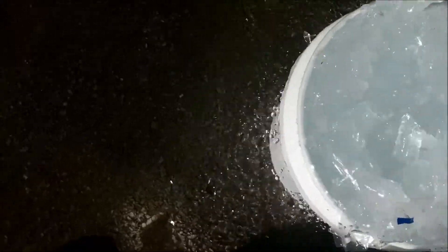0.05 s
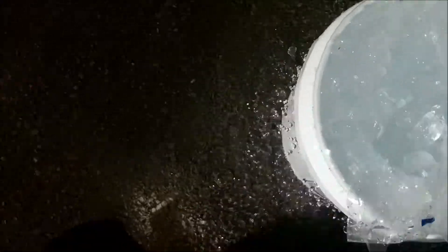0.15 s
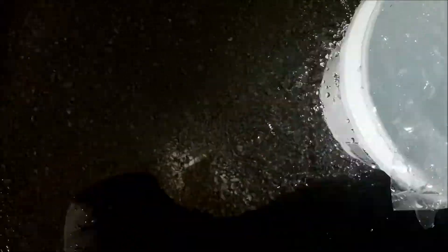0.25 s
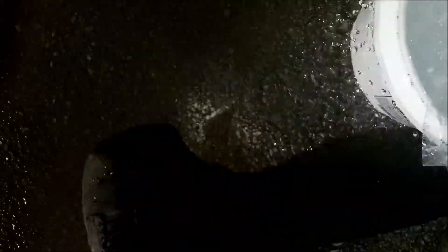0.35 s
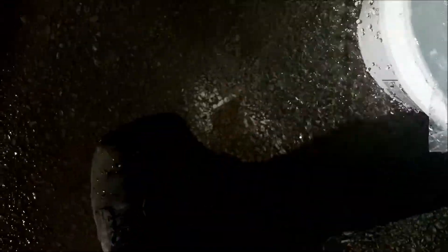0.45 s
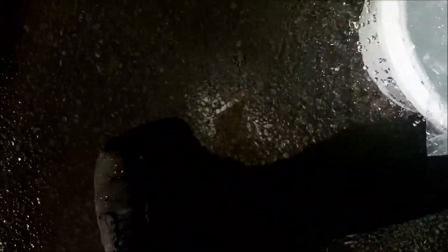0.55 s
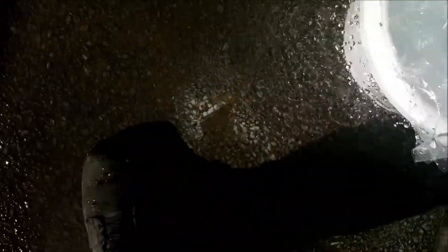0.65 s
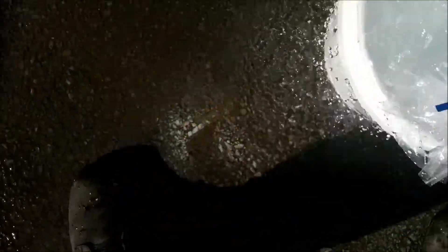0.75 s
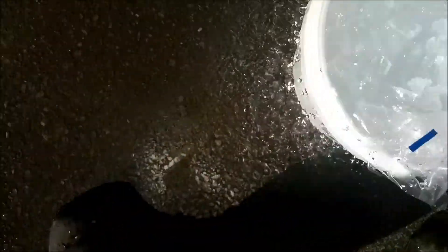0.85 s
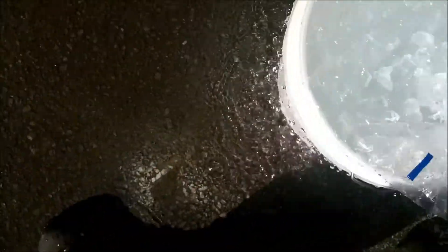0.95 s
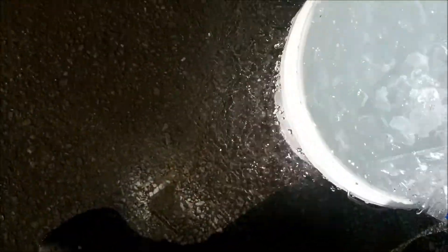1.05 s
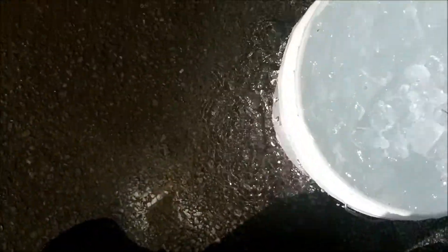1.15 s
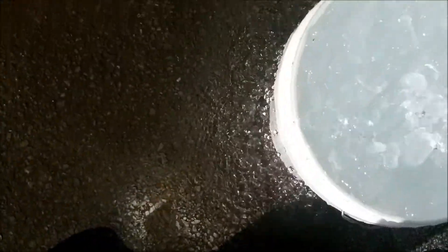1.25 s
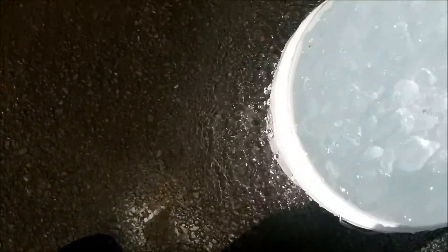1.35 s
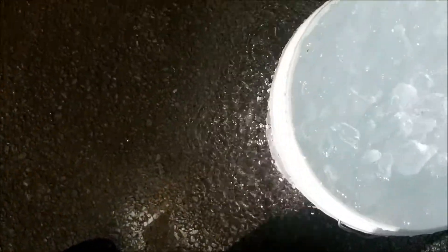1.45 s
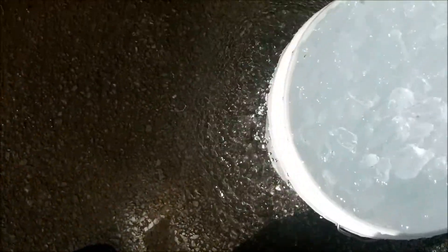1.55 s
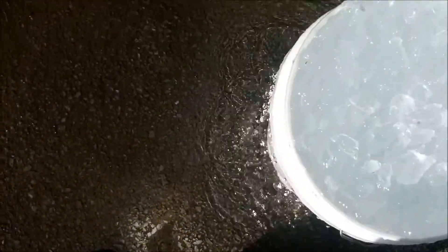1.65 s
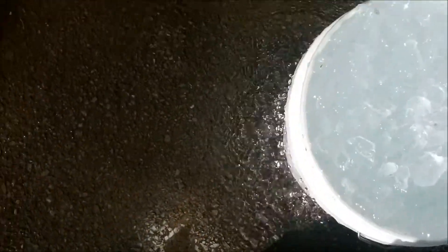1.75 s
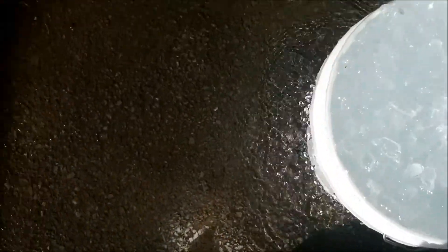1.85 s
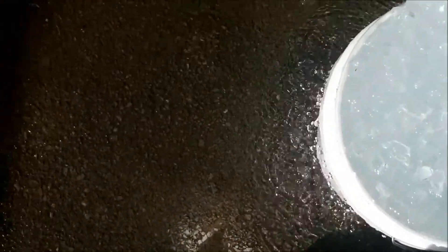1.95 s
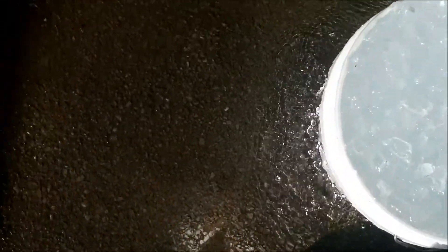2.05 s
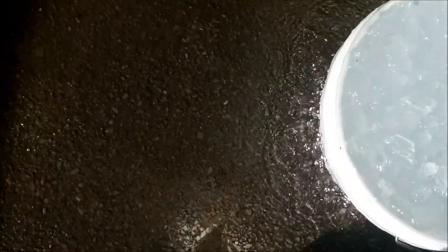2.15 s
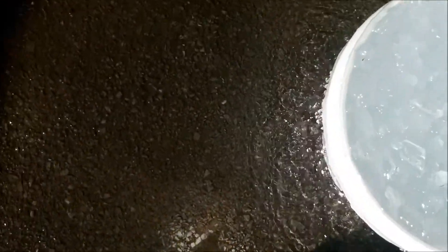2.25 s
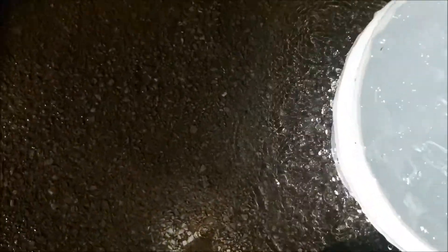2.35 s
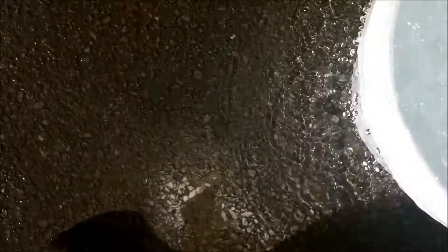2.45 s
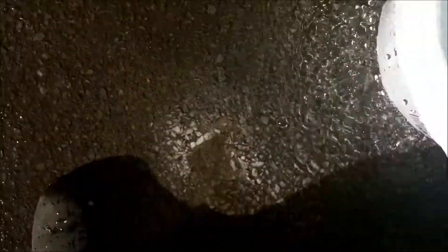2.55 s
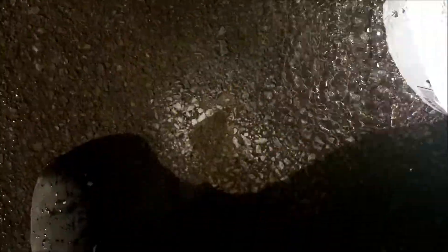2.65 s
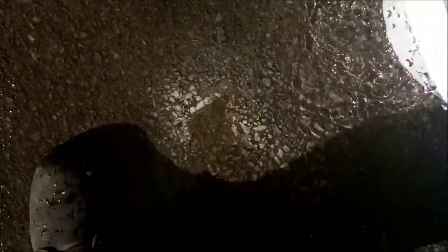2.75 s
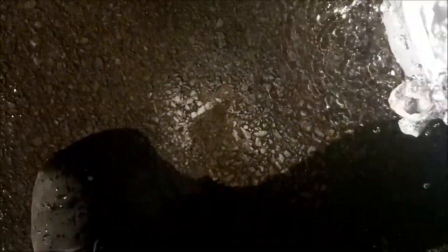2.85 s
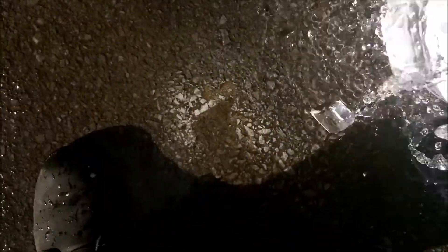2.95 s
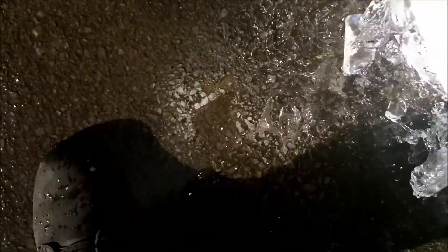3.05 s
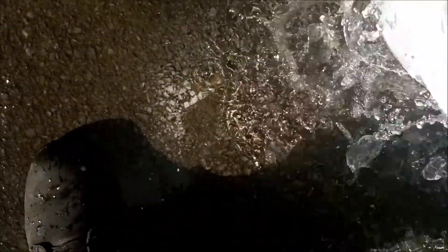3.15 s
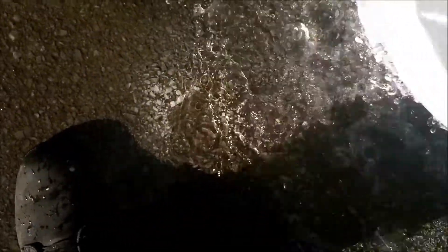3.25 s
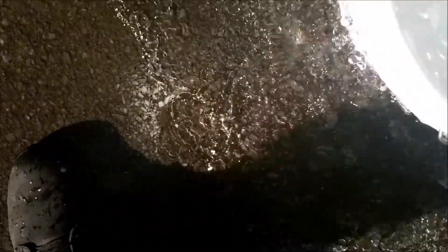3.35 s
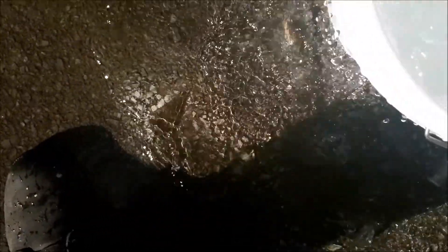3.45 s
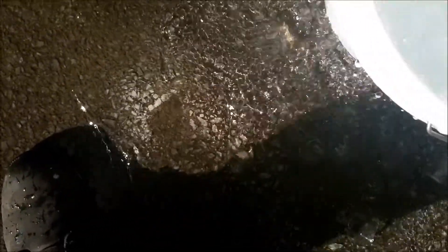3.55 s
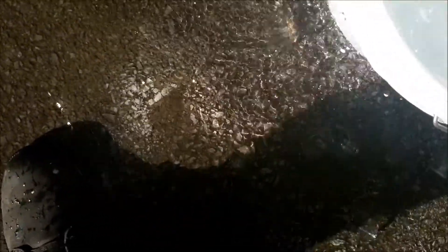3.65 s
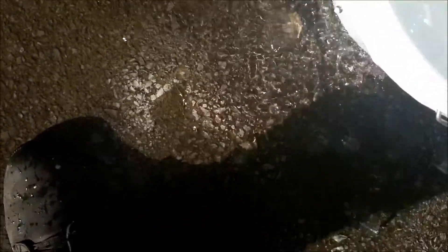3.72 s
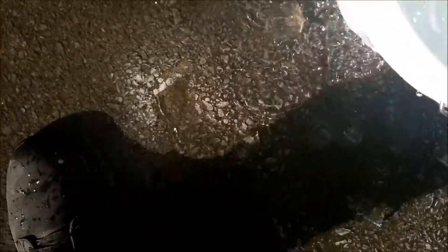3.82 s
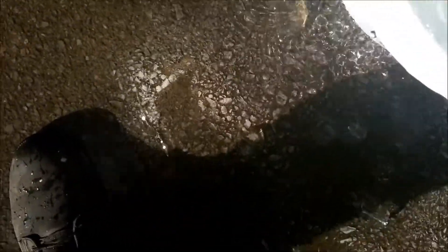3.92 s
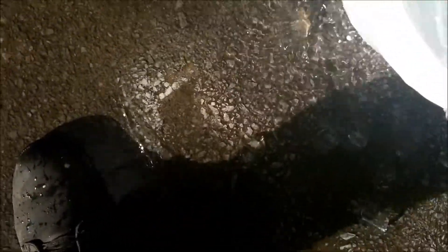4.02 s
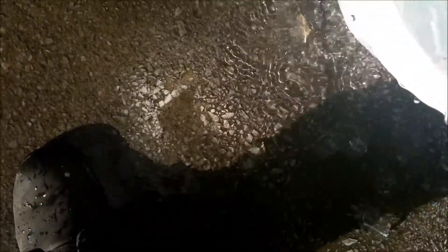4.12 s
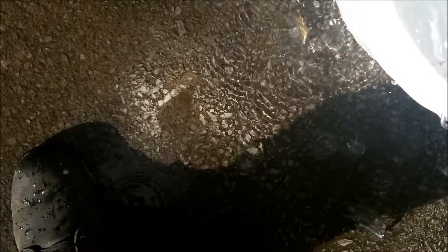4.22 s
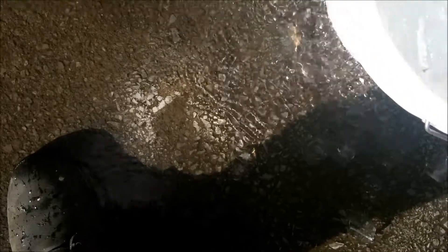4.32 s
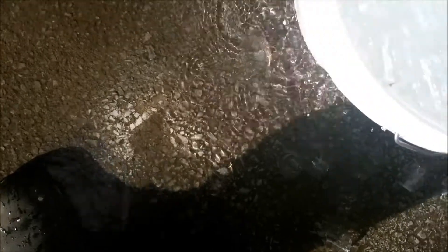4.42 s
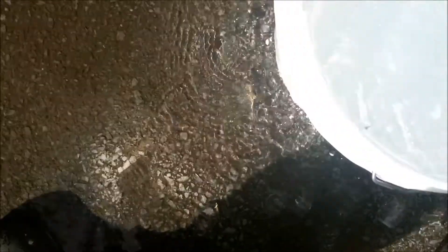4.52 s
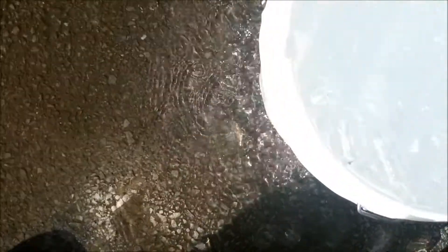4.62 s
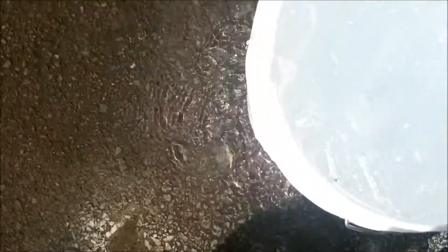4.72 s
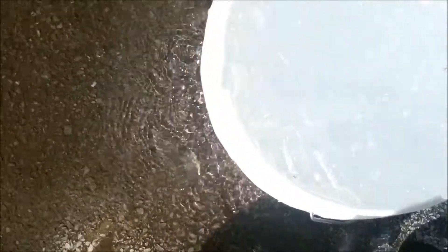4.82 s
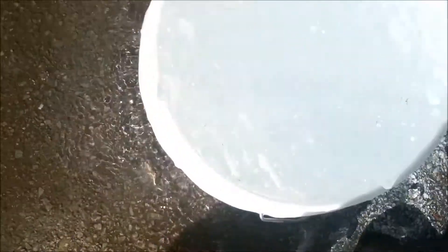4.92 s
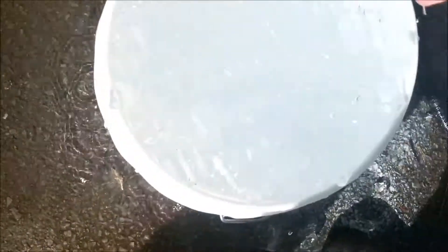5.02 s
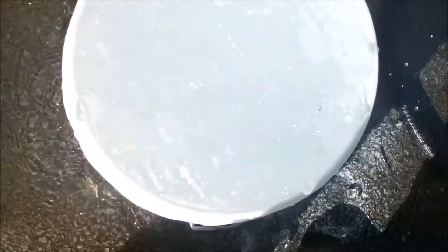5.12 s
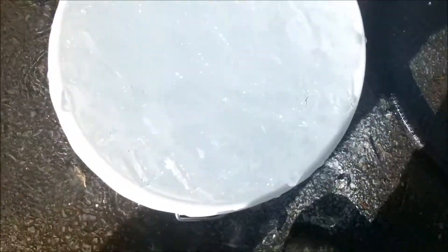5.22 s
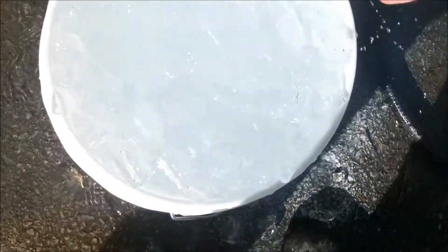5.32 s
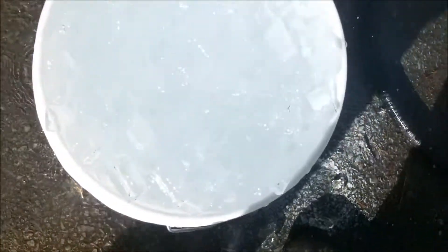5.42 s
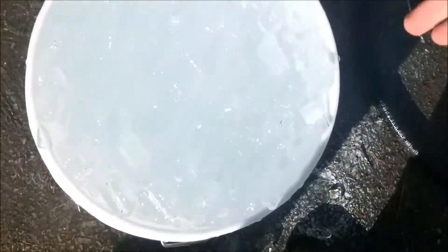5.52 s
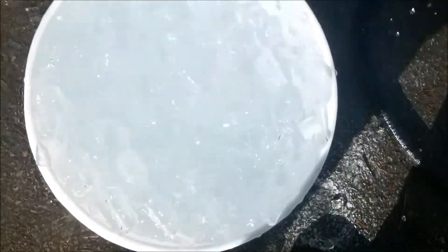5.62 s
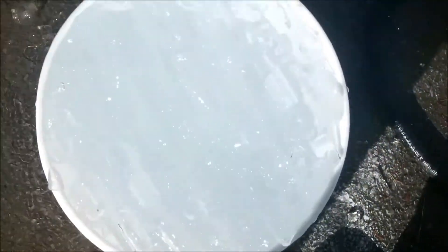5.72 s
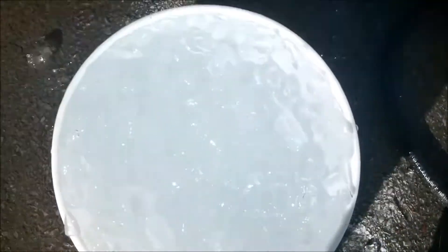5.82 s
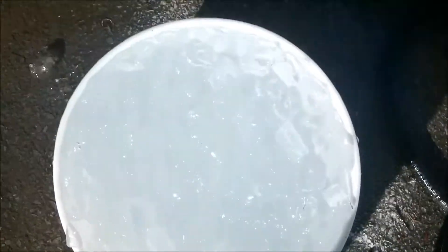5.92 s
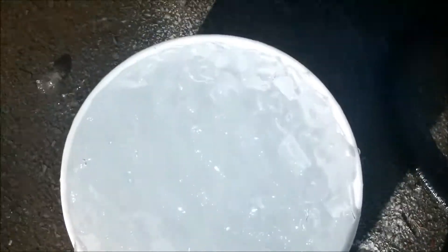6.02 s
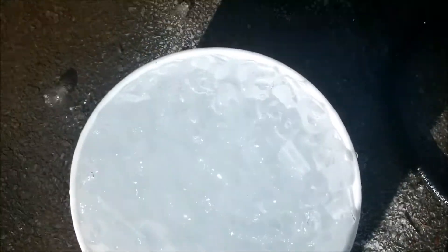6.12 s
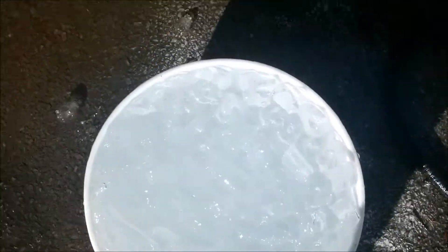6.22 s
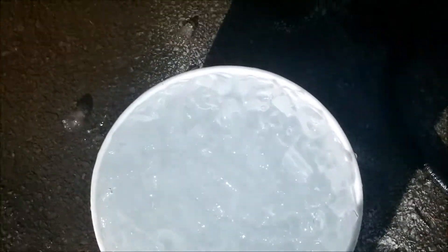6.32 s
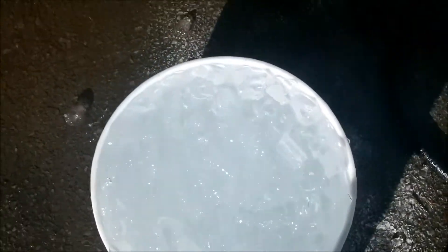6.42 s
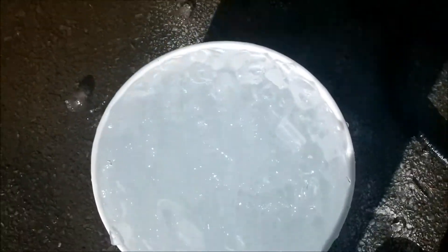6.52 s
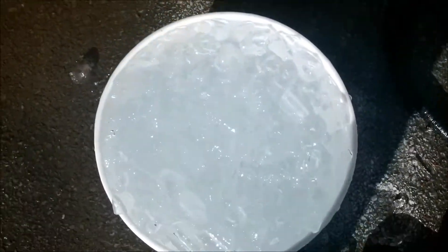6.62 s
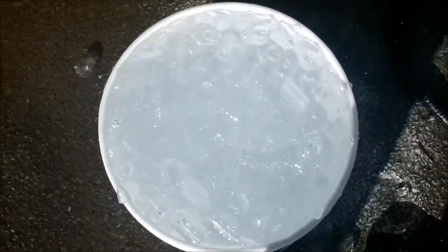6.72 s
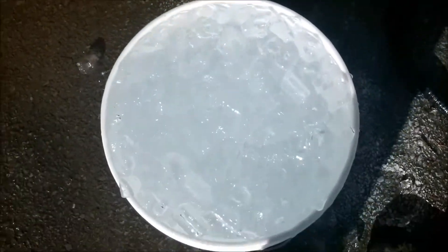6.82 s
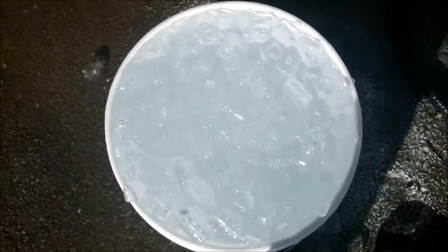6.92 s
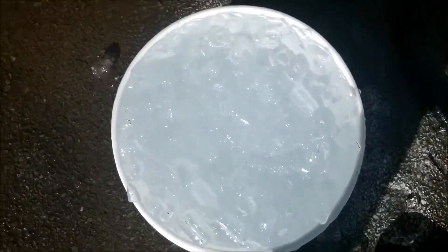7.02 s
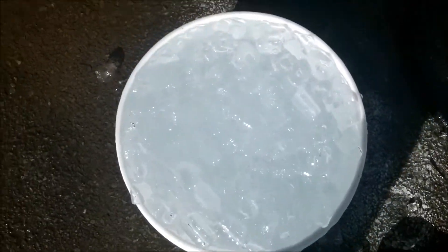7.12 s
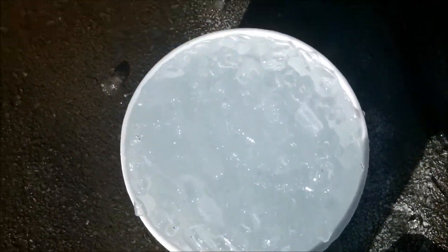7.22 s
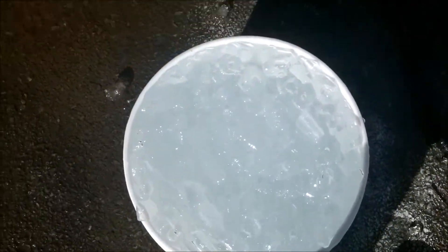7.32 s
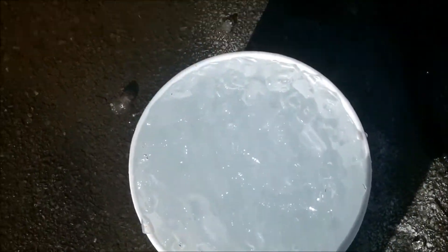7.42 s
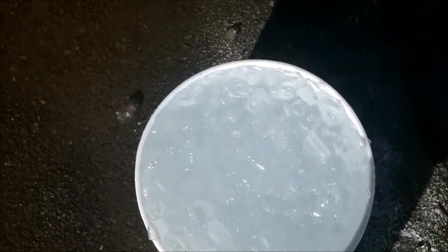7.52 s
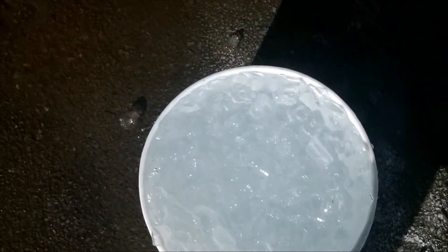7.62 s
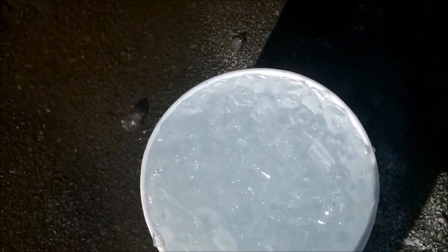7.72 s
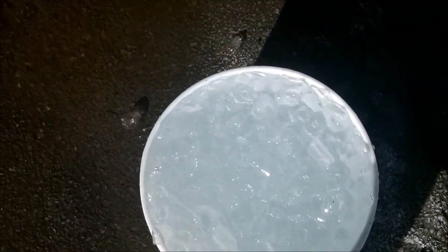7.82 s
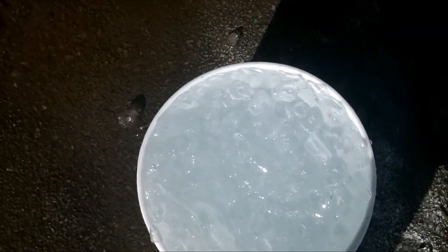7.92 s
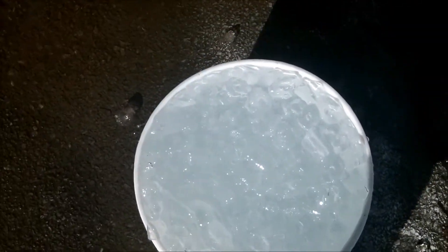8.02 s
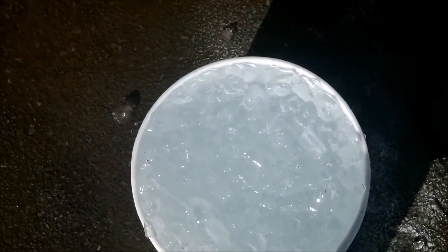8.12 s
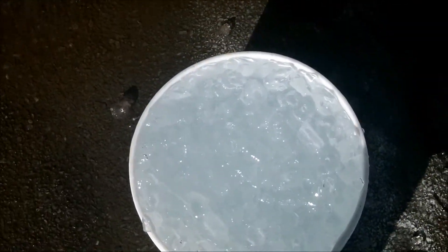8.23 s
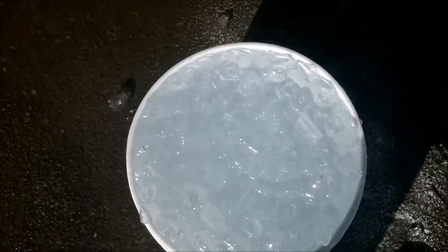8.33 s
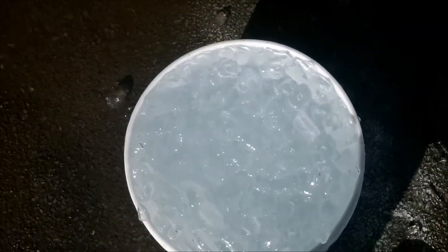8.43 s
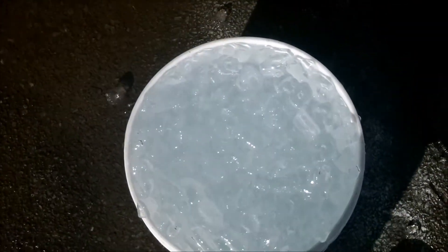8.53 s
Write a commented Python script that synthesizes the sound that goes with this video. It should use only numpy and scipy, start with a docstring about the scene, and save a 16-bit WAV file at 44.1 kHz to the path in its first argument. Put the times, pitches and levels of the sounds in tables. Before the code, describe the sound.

Ice pours from a crinkling plastic bag into a full bucket, water sloshes over onto asphalt, then shoes scuff over a distant machine hum.

```python
"""Outdoors on wet asphalt, close by: ice is shaken from a crinkling plastic bag into a full bucket.
The film snaps, cubes knock and rattle, and the air they drag under water rings as rising plops.
The bucket tips with a low rumble; water and ice slop over the rim in waves, then trickle out.
Shoes scuff on grit and a thin squeal follows. Distant machines hum and whine throughout."""
import sys
import numpy as np
from scipy import signal
from scipy.io import wavfile
from scipy.ndimage import uniform_filter1d

SR = 44100
rng = np.random.default_rng(int(sys.argv[2]) if len(sys.argv) > 2 else 0)


def wav_record(signal):
    """Record a signal, one row per channel, as 16-bit PCM in the file named by sys.argv[1]."""
    frames = np.transpose(np.atleast_2d(signal))
    bounded = np.clip(frames, -1, 1)
    # unit amplitude maps onto the largest positive 16-bit level
    quanta = np.round(bounded * 32767).astype(np.int16)
    wavfile.write(sys.argv[1], SR, quanta)


N = 377937
TIME = np.arange(N) / SR

# tone of plastic film and rattling ice: f/Hz, level/dB
BAG_EQ = [(60, -38), (300, -10.5), (500, -16.5), (750, -9), (1100, -6.5), (1600, -0.5), (2500, 3.5),
          (3300, -2.5), (5000, -8), (6000, -13.5), (6800, -23), (7800, -37), (11800, -33), (15000, -65)]
# steady overflow between the waves: t/s, level/dB
STREAM = [(2.55, -35), (2.85, -33), (3.3, -29), (3.85, -26), (4.4, -26.5), (4.75, -30.5), (4.95, -37.5),
          (5.2, -45)]


def amp(db):
    """Decibels to gain."""
    return 10 ** (np.asarray(db) / 20)


def unit_rms(x):
    """Scales to rms 1."""
    return x / np.sqrt(np.mean(x ** 2) + 1e-20)


def add(mix, start_s, sound):
    """Drops a sound into the mix."""
    part = mix[max(round(start_s * SR), 0):][:len(sound)]
    part += sound[:len(part)]


def fader(rows):
    """A gain ride through rows of (t/s, level/dB), fading to silence outside them."""
    times, db = np.transpose(rows)
    outside_s = np.maximum(times[0] - TIME, 0) + np.maximum(TIME - times[-1], 0)
    return amp(np.interp(TIME, times, db)) * np.exp(-outside_s / 0.027)


def surges(rows, attack_s, release_s, column=2):
    """One attack-hold-release envelope per row of (t/s, hold/s, levels/dB); their powers add."""
    power = np.zeros(N)
    for row in rows:
        start_s, hold_s = row[:2]
        t = np.arange(int((hold_s + 6 * release_s) * SR)) / SR
        envelope = np.minimum(t / attack_s, 1) * np.exp(-np.maximum(t - hold_s, 0) / release_s)
        add(power, start_s, (amp(row[column]) * envelope) ** 2)
    return np.sqrt(power)


def eq(x, curve):
    """Minimum-phase EQ through (f/Hz, level/dB), so that clicks keep their sharp front."""
    hz, db = np.transpose(curve)
    size = 2 ** 12
    bins_hz = abs(np.fft.fftfreq(size, 1 / SR))
    log_gain = np.log(amp(np.interp(np.log(bins_hz + 1), np.log(hz + 1), db)))
    response = np.exp(np.conj(signal.hilbert(log_gain)))
    taps = np.fft.ifft(response).real
    return signal.oaconvolve(x, taps[:size // 2])[:len(x)]


def noise(curve):
    """Noise of rms 1, shaped by an EQ curve."""
    return unit_rms(eq(rng.standard_normal(N), curve))


def ping(hz, ring_s, octaves_per_s=0):
    """A dying vibration with a fast attack and an optional upward glide."""
    t = np.arange(int(7 * ring_s * SR) + 32) / SR
    envelope = np.exp(-t / ring_s) * (1 - np.exp(-(2 * hz * t) ** 2))
    pitch = hz * 2 ** (octaves_per_s * np.minimum(t, 3 * ring_s))
    return envelope / envelope.max() * np.sin(2 * np.pi * np.cumsum(pitch) / SR)


def impacts(per_s, spread_db):
    """A random train of blows, mostly small, a few large."""
    chance, size, sign = rng.random((3, N))
    at, out = chance < per_s / SR, np.zeros(N)
    out[at] = np.sign(sign[at] - .5) * amp(spread_db * np.minimum(-np.log(size[at]), 4))
    return out


def levelled(x, span_s):
    """Evens out the slow level of a texture and keeps its fine grain."""
    window = int(span_s * SR)
    power = uniform_filter1d(uniform_filter1d(x ** 2, window), window)
    return x / np.sqrt(abs(power) + 0.027 * np.mean(x ** 2))


def grains(per_s, spread_db, cycles, glide, count=140):
    """Small bodies of many sizes ring for a few cycles each; glide is in octaves per ring time."""
    blows, out = impacts(per_s, spread_db), np.zeros(N + SR)
    at = np.flatnonzero(blows)
    body = rng.integers(0, count, N)[at]
    for k, hz in enumerate(np.geomspace(600, 7500, count)):
        ring = hz * ping(hz, cycles / hz, glide * hz / cycles)  # weighted for a flat spectrum
        starts = at[body == k, None]
        np.add.at(out, starts + np.arange(len(ring)), blows[starts] * ring)
    return unit_rms(out[:N])


def flutter(per_s, depth_db):
    """A random gain that wavers about per_s times a second."""
    knots = rng.standard_normal(N // 100)
    return amp(depth_db * np.interp(TIME * per_s, np.arange(len(knots)), knots))


def resonance(hz, width_hz):
    """A narrow band of noise, rms 1, whose pitch may move."""
    pole = np.exp(-np.pi * width_hz / SR)
    white = rng.standard_normal(N) + 1j * rng.standard_normal(N)
    wander = signal.lfilter([1], [1, -2 * pole, pole * pole], white)
    carrier = np.exp(2j * np.pi * np.cumsum(hz * np.ones(N)) / SR)
    return unit_rms((wander * carrier).real)


def reflections(x, echo_db, decay_s, count=70):
    """The bucket wall and the ground scatter a sound back within a few hundredths of a second."""
    delay_s = np.geomspace(.0012, .06, count) * rng.uniform(.95, 1.05, count)
    polarity = rng.choice([-1, 1], count)
    taps = np.zeros(SR // 10)
    taps[(delay_s * SR).astype(int)] = polarity * np.exp(-delay_s / decay_s) * np.sqrt(delay_s)
    return x + amp(echo_db) * signal.oaconvolve(x, taps / np.linalg.norm(taps))[:N]


def outdoors():
    """The bed: distant noise, a few machine whines and a far engine that swells and fades."""
    # tone of the open air: f/Hz, level/dB
    air_eq = [(25, 0.5), (140, -1), (210, -3), (400, -2), (650, -2.5), (1900, -2.5), (2700, -6),
              (3800, -14), (5000, -16.5), (6000, -16.5), (6800, -23.5), (7900, -37), (9500, -24.5),
              (15000, -24.5)]
    # its slow swell: t/s, level/dB
    air_ride = [(0, .5), (5.3, 0), (7.8, -0.25), (8.4, 2), (8.57, -1)]
    # distant machines: f/Hz, width/Hz, opening level/dB, closing level/dB
    machines = [(344.4, 6, -56.5, -51.5), (475, 37, -79, -49), (863, 87, -47, -58.5),
                (1505, 105, -56.5, -49.5), (3740, 170, -57, -59.5)]
    # engine swells: t/s, hold/s, hum/dB, rumble/dB
    swells = [(5.0, 0.55, -48.5, -63), (6.48, 0.85, -45, -48), (7.8, 0.27, -45, -55), (8.34, .2, -54, -52)]
    attack_s, release_s, idle_db = 0.15, 0.084, -56
    air = amp(-39.5) * fader(air_ride) * noise(air_eq) * flutter(per_s=6, depth_db=1.27)
    whines = sum(amp(np.linspace(first_db, last_db, N)) * levelled(resonance(hz, width), span_s=0.086)
                 for hz, width, first_db, last_db in machines)
    hum_gain = np.hypot(amp(idle_db), surges(swells, attack_s, release_s))
    hum = hum_gain * levelled(resonance(76.3, width_hz=3.1), span_s=.1)
    rumble = surges(swells, attack_s, release_s, column=3) * resonance(55, width_hz=106)
    return air + whines + hum + rumble


def ice_flow():
    """Envelope of the ice leaving the bag: a steady slide and a surge at each shake."""
    # sliding between shakes: t/s, level/dB
    slide = [(0, -26.5), (1.1, -25.5), (1.72, -30.5), (1.85, -41.5), (2.55, -39)]
    # a batch of ice per shake, the last ones nearly empty: t/s, hold/s, level/dB
    shakes = [(.11, 0.053, -19), (.22, 0.089, -24.5), (.305, 0.056, -18), (.43, 0.071, -23.5),
              (.62, .025, -20.5), (.76, 0.053, -20.5), (.895, 0.13, -20), (1.148, 0.036, -19),
              (1.265, 0.044, -18.5), (1.405, 0.024, -21), (1.505, .04, -29), (1.615, 0.067, -25),
              (2.11, 0.065, -30.5), (2.25, 0.015, -25.5), (2.32, 0.018, -36), (2.41, 0.022, -29.5),
              (2.48, 0.022, -24.5), (2.59, 0.038, -21.5)]
    return np.hypot(fader(slide), surges(shakes, attack_s=0.017, release_s=0.036))


def bag():
    """Plastic film snaps in clumps while small cubes rattle over each other."""
    snaps = unit_rms(impacts(per_s=3500, spread_db=3.5))
    rattle = grains(per_s=1600, spread_db=3.5, cycles=2.7, glide=0)
    crinkle = eq(snaps + amp(-6.5) * rattle, BAG_EQ) * flutter(per_s=200, depth_db=3.0)
    crinkle = reflections(crinkle, echo_db=-11, decay_s=.012)
    return amp(-0.3) * ice_flow() * levelled(crinkle, span_s=0.023)


def cubes():
    """A knock is a sharp crack and a short ring; in water the crack softens and a bubble glides up."""
    # hardest knocks of cubes on each other or the bucket: t/s, level/dB, f/Hz, ring/s
    knocks = [(.131, -6.5, 2660, 0.0014), (.3035, 3.5, 2570, .0005), (.391, -12, 2050, 0.0011),
              (.4622, -6, 2880, .0007), (.476, -7, 5540, 0.00069), (.5348, -5, 2500, 0.00059),
              (.64, -9, 2550, .001), (.779, -3, 2550, 0.001), (.8754, -3.5, 2130, .0005),
              (1.1525, -3.5, 3270, 0.00028), (1.2925, -5, 2530, 0.00057), (1.311, -8.5, 5240, 0.0008),
              (1.449, -0.5, 2960, 0.00033), (1.4571, 5, 4070, 0.00024), (1.5221, 0.5, 2700, .0004),
              (1.5752, 7, 3930, 0.00024), (1.6216, -4.5, 4670, .0005), (1.636, 1.5, 2800, 0.00036),
              (1.6934, -7, 2310, 0.00046), (1.715, -4.5, 2700, .0002), (1.7724, -10.5, 3400, 0.0004),
              (1.934, -6, 2450, 0.00074), (1.9957, -11.5, 6100, 0.0006), (2.176, -17, 5300, 0.00088),
              (2.492, -15, 5000, 0.001), (2.802, -2, 3300, 0.00032), (2.8155, 1.5, 4900, 0.00018),
              (3.1416, 1, 1800, 0.00052), (3.218, -7, 4460, 0.00035), (3.449, -2, 2380, 0.00055),
              (3.461, 0, 2260, 0.00023), (3.7195, 1.5, 2300, 0.00053), (3.7912, 2, 4220, 0.00027),
              (4.2607, -2, 1920, 0.0012), (4.5141, -2, 2270, 0.00032)]
    # air pockets trapped by plunging cubes: t/s, level/dB, f/Hz, ring/s
    bubbles = [(.102, -9, 2100, .0035), (.554, -13.5, 1980, 0.0041), (.72, -5, 1800, 0.0017),
               (.9, -12, 1230, .006), (1.924, -11.5, 1550, 0.0027), (1.9386, 0, 1620, 0.0014),
               (2.04, -18.5, 2810, 0.0067), (2.138, -4.5, 3080, 0.0014), (2.152, -15, 1213, 0.01),
               (2.541, -7.5, 1750, 0.0019), (2.8315, -0.5, 2150, .0012), (2.839, -5, 2680, .001),
               (3.084, -11, 2670, 0.0025), (3.1715, -1, 2220, .0027), (3.2262, 0, 2260, .0018),
               (3.26, -0.5, 2050, 0.0023), (3.303, -7, 1640, .007), (3.328, 0.5, 2380, .0011),
               (3.3453, -1, 1730, 0.0014), (3.361, -6, 1430, 0.0037), (3.4195, 0, 2150, 0.0014),
               (3.5, -11, 2400, .001), (3.5328, -1, 2270, .0012), (3.568, -11, 2190, .004),
               (3.698, -5, 3160, 0.0014), (4.0506, -8, 2220, 0.0024), (4.462, -11, 1850, 0.0051),
               (4.486, -7.5, 1850, 0.0045), (4.501, -9.5, 1140, 0.0089), (4.576, -10, 1425, 0.012),
               (4.595, -14, 1990, .006), (4.616, -15, 1700, .008), (4.673, -11, 2040, .007),
               (4.689, -13, 2290, 0.012), (4.865, -18.5, 2140, .004), (5.028, -22, 2000, .006),
               (5.091, -15.5, 2130, .003)]
    # tone of the contact crack: f/Hz, level/dB
    crack_eq = [(200, -20), (900, -10.5), (2500, -18.5), (5500, -1), (6500, -7.5), (7800, -15),
                (12000, -16.5), (16000, -21)]
    cube_eq = [(200, -12), (900, -4), (5500, 1), (6500, -3.5), (7800, -13), (12000, -9.5), (16000, -18)]
    cushion_s, strays_per_s = 0.00035, 20
    crack = eq(signal.unit_impulse(SR // 20), crack_eq)
    out = np.zeros(N)

    def hit(hz, ring_s, octaves_per_s=0):
        """A crack and its ring, of peak 1; water cushions the blows that ring long."""
        sound = np.zeros(SR // 10)
        add(sound, 0, amp(2.5) * crack / crack.max() / (1 + ring_s / cushion_s))
        add(sound, 0, ping(hz, ring_s, octaves_per_s))
        return sound / abs(sound).max()

    for start_s, db, hz, ring_s in knocks:
        add(out, start_s, amp(db) * hit(hz, ring_s))
    for start_s, db, hz, ring_s in bubbles:  # long-lived bubbles near the surface glide fastest
        add(out, start_s, amp(db) * hit(hz, ring_s, octaves_per_s=2100 * ring_s))
    flow = np.hypot(ice_flow(), fader(STREAM))
    for when, size, pitch in rng.random((int(strays_per_s * N / SR), 3)):  # lesser knocks ride the flow
        at = int(when * N)
        stray = hit(hz=1700 * 2 ** (1.27 * pitch), ring_s=0.00076)
        add(out, at / SR, flow[at] * amp(3 + 7 * size) * stray)
    return reflections(eq(out, cube_eq), echo_db=-7.5, decay_s=0.0024)


def slumps():
    """A clump lands: a short rush of clicks, and a dull thump from the water and the bucket."""
    # clumps of ice and water dropping at once: t/s, rush/dB, length/s, thump/dB
    clumps = [(0.13, -26, 0.037, -39), (0.698, -19.5, 0.034, -30), (0.964, -21, 0.035, -30),
              (1.302, -22.5, 0.032, -35), (1.512, -27, .009, -54), (1.543, -15, 0.0068, -47),
              (2.699, -19.5, 0.019, -20), (3.459, -14, 0.0086, -25.5), (3.524, -13.5, 0.0047, -21),
              (3.731, -22, 0.0084, -26.5), (3.978, -23.5, 0.022, -38)]
    # tone of the thump: f/Hz, level/dB
    thump_eq = [(30, -23), (110, -4.5), (300, -5), (800, 9.5), (1300, 7.5), (2500, -38), (6000, -69)]
    rush_gain, thump_gain = np.zeros((2, N))
    for start_s, rush_db, length_s, thump_db in clumps:
        age = np.arange(int(5 * length_s * SR)) / (length_s * SR / 2)
        envelope = age * np.exp(1 - age)
        add(rush_gain, start_s, amp(rush_db) * envelope)
        add(thump_gain, start_s, amp(thump_db) * envelope)
    clicks = unit_rms(eq(impacts(per_s=3500, spread_db=4.5), BAG_EQ))
    return rush_gain * clicks + thump_gain * noise(thump_eq)


def trickle():
    """Separate drops, each trapping a tiny bubble whose pitch rises."""
    # drips as the bag drains and as the spill dies away: t/s, level/dB
    drip_ride = [(1.4, -26.5), (1.8, -35), (2.5, -36), (4.5, -30.5), (4.8, -34.5), (5.0, -44.5),
                 (5.3, -49.5), (5.6, -56)]
    drip_eq = [(300, -27), (1200, -2.5), (2200, 5.5), (5500, -5), (6500, -13), (7800, -43), (15000, -30)]
    drips = eq(grains(per_s=280, spread_db=3.0, cycles=3.3, glide=0.029), drip_eq)
    return fader(drip_ride) * levelled(drips, span_s=.15)


def bucket_shift():
    """The heavy bucket rumbles as it shifts on the ground."""
    # swell of the rumble: t/s, level/dB
    shift_ride = [(2.3, -50), (2.55, -45), (2.66, -41), (2.73, -36), (2.8, -43), (2.95, -53)]
    # tone of the rumble: f/Hz, level/dB
    rumble_eq = [(25, 2.5), (70, -5.5), (140, -8), (380, -3), (700, -9.5), (3000, -58)]
    return fader(shift_ride) * noise(rumble_eq)


def overflow(part, stream_db):
    """Envelope of the water, spray or ring at the rim: a steady stream with waves on top."""
    # waves of water and ice slopping over: t/s, hold/s, water/dB, spray/dB, ring/dB
    gushes = [(2.68, 0.023, -20, -29.5, -45), (2.81, 0.093, -20.5, -29, -20),
              (2.94, 0.24, -19.5, -36, -22.5), (3.3, 0.073, -22, -28, -34),
              (3.455, 0.12, -22.5, -28.5, -35), (3.63, 0.1, -20.5, -25.5, -40),
              (3.965, 0.077, -18, -40, -23), (4.11, 0.095, -22, -35, -27), (4.23, 0.052, -20, -36, -23),
              (4.45, 0.089, -20, -35, -29), (4.585, 0.097, -24.5, -48, -32)]
    column = {"water": 2, "spray": 3, "ring": 4}[part]
    waves = surges(gushes, attack_s=0.013, release_s=0.07, column=column)
    return np.hypot(amp(stream_db) * fader(STREAM), waves)


def spill():
    """Water slaps the asphalt in drops and bubbles; thin spray brightens it."""
    # tone of the splash: f/Hz, level/dB
    splash_eq = [(60, -27), (420, -27.5), (650, -13), (1100, -6), (1700, -0.5), (1900, -2.5), (2220, 2.5),
                 (2500, 1), (3300, -6), (5000, -16), (6000, -22.5), (6800, -34), (7800, -37), (15000, -48)]
    drops = unit_rms(impacts(per_s=7000, spread_db=1.5))
    bubbles = grains(per_s=2500, spread_db=3.5, cycles=5.3, glide=0.029)
    splash = eq(drops + amp(-3.0) * bubbles, splash_eq) * flutter(per_s=88, depth_db=3.0)
    splash = levelled(splash, span_s=0.022)
    highs = signal.sosfiltfilt(signal.butter(3, 3400, "high", fs=SR, output="sos"), splash)
    water = amp(-1.0) * overflow("water", stream_db=0) * unit_rms(splash - highs)
    spray = amp(-1.5) * overflow("spray", stream_db=-6.5) * unit_rms(highs)
    return water + spray


def hollow_ring():
    """In the spill, cubes and trapped air of like size ring near one pitch."""
    patter = signal.oaconvolve(impacts(per_s=560, spread_db=1.0), ping(hz=2170, ring_s=0.0023))[:N]
    return amp(-2.0) * overflow("ring", stream_db=-6.5) * levelled(patter, span_s=0.034)


def scuffs():
    """Grit cracks under a sole: a brief shower of tiny clicks with one broad pitch."""
    # shoes on wet grit: t/s, level/dB, f/Hz, decay/s
    scrapes = [(5.725, -23.5, 2400, .002), (5.811, -24, 2400, .002), (6.06, -23.5, 2380, 0.0022),
               (6.8615, -19, 4470, 0.002), (6.866, -23.5, 2000, 0.0038), (7.013, -22.5, 2640, 0.0045),
               (7.039, -26, 3220, .004), (7.137, -15.5, 3560, 0.0024), (7.215, -24.5, 1930, 0.0089),
               (7.25, -22.5, 3430, 0.0022), (7.384, -23.5, 2800, 0.0047), (7.394, -13.5, 3180, 0.0022),
               (7.416, -24, 3400, 0.026)]
    grit_eq = [(200, 8), (1500, 5.5), (5000, -1.5), (7800, 0.5), (9500, 14), (15000, 4)]
    out, t = np.zeros(N), np.arange(SR // 5) / SR
    for start_s, db, hz, decay_s in scrapes:
        grit = rng.standard_normal(len(t))
        clicks = grit * abs(grit) * np.exp(-t / decay_s)  # squaring makes the noise spiky
        burst = signal.fftconvolve(clicks, ping(hz, ring_s=0.00029))
        burst *= np.sqrt(decay_s * SR / 2) / np.linalg.norm(burst)
        add(out, start_s, amp(db - 7.5) * burst)
    return reflections(eq(out, grit_eq), echo_db=-9, decay_s=0.067)


def squeal():
    """A faint, thin squeal sags in pitch after the last scuff."""
    start_s, end_s, sag_s = 7.42, 7.75, .09
    from_hz, to_hz = 3750, 3260
    hz = to_hz + (from_hz - to_hz) * np.exp(-np.maximum(TIME - start_s, 0) / sag_s)
    return fader([(start_s, -48.5), (end_s, -54.5)]) * resonance(hz, width_hz=130)


def scene():
    """Ice, water, shoes and the outdoor bed, mixed to mono."""
    pour = bucket_shift() + bag() + spill() + trickle() + hollow_ring() + slumps() + cubes()
    return (pour + scuffs() + squeal() + outdoors())[None]


def record(dry):
    """The hardest knocks overload the input; a steep low-pass then trims the top."""
    clipped = np.clip(dry, -1, 1)
    low_pass = signal.firwin(401, cutoff=15700, window=("kaiser", 8), fs=SR)
    return signal.oaconvolve(clipped, low_pass[None], "same")


dry = scene()
out = record(dry)
wav_record(out)
```